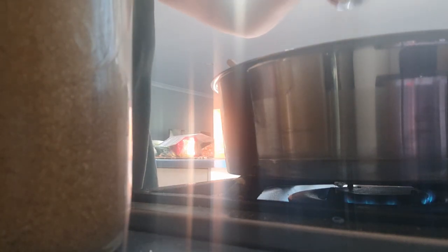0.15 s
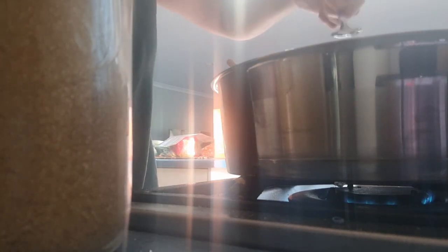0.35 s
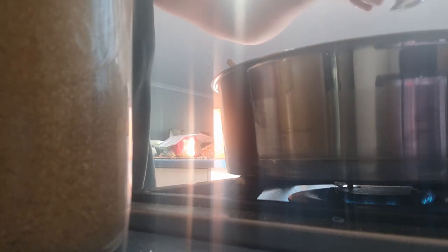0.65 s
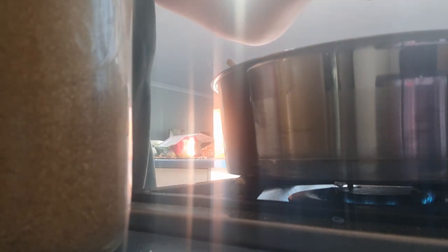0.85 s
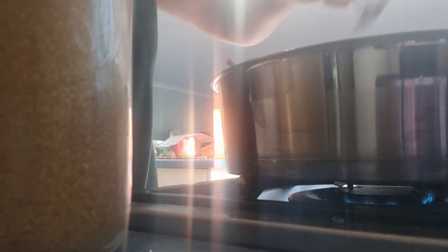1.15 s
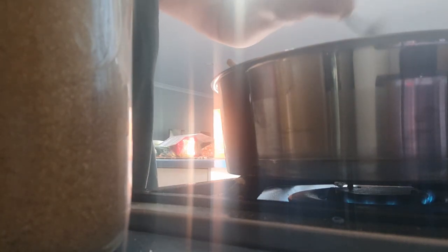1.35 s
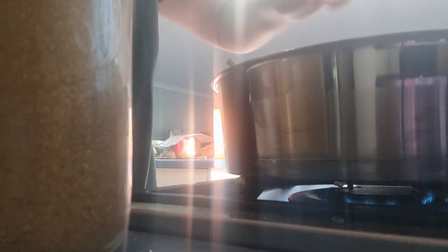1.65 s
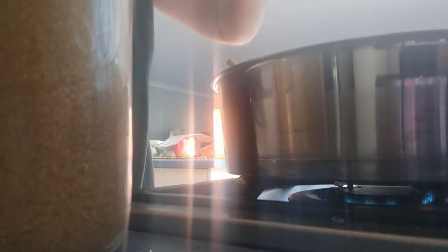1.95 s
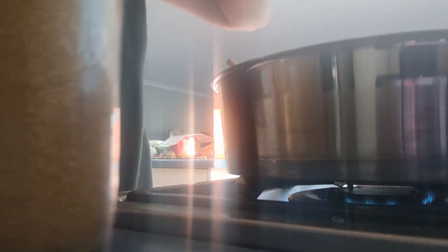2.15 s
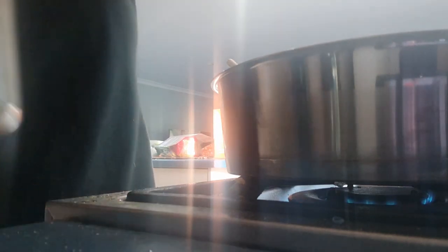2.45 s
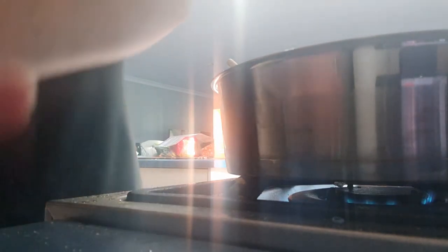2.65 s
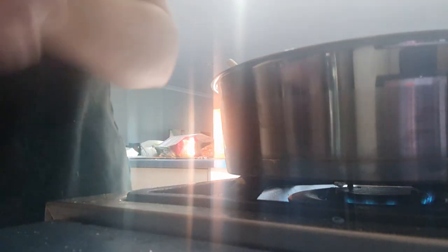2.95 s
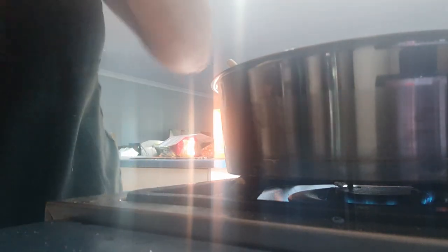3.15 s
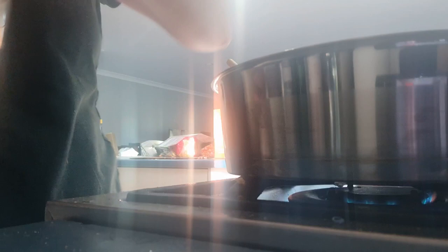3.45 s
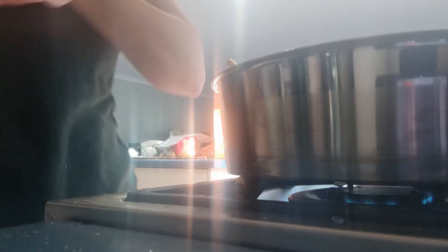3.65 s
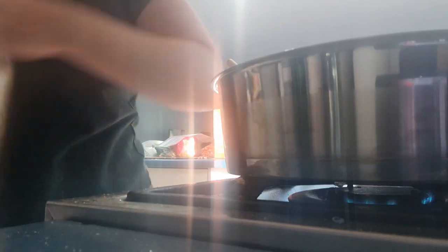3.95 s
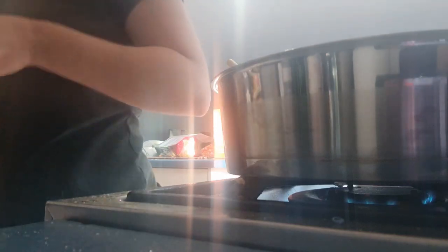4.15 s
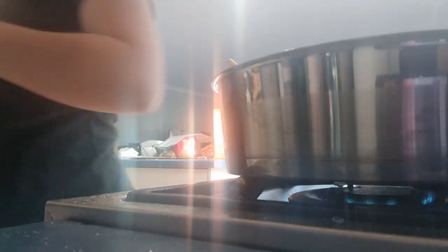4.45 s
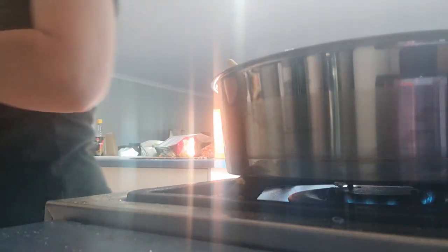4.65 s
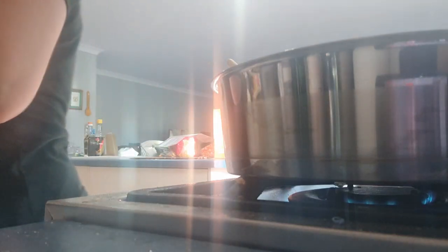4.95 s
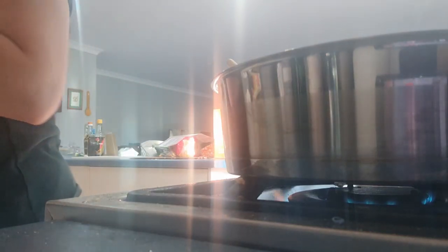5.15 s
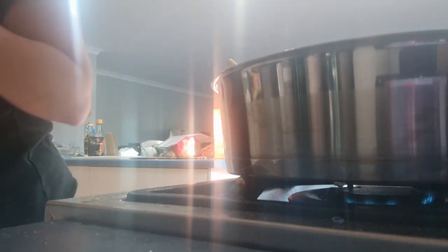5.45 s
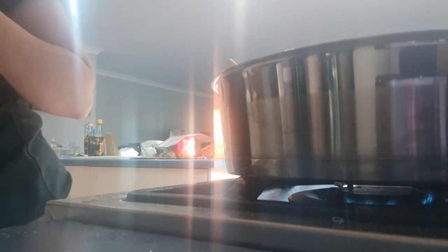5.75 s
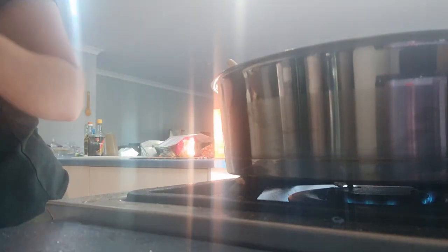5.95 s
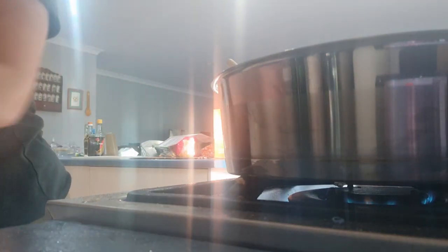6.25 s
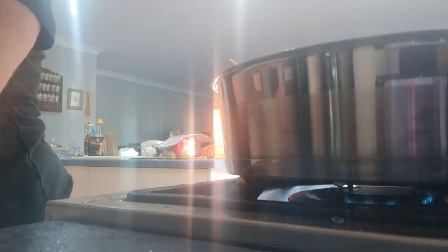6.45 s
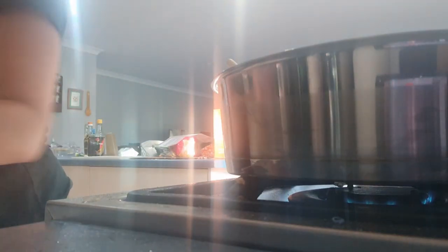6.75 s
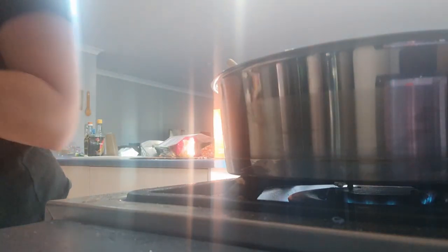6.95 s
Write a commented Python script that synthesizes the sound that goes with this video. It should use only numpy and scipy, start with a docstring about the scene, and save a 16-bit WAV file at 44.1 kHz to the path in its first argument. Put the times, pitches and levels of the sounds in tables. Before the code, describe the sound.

A gas burner hisses and flutters steadily under a steel pot while containers click and knock, then heavy thumps and one bright dish clink.

```python
"""A kitchen worktop, with a stereo microphone standing on it close to a steel pot on a lit gas burner.
Broad noise makes the jet's hiss; resonant noise makes the flame that rumbles and rings the gap under the pot.
A cook handles seasoning containers: noise bursts and damped modes make light clicks, knocks and thumps,
two of them heavy, and shaped noise the scrape of a jar. Near the end come a dish's clatter and bright clink."""
import sys
import numpy as np
from scipy import signal
from scipy.fft import rfft, irfft, next_fast_len
from scipy.io import wavfile
from scipy.ndimage import uniform_filter1d, map_coordinates

SR = 44100
rng = np.random.default_rng(int(sys.argv[2]) if len(sys.argv) > 2 else 0)


def pcm_store(signal):
    """Save signal as 16-bit PCM."""
    levels = np.round(np.clip(np.atleast_2d(signal), -1, 1) * 32767)
    wavfile.write(sys.argv[1], SR, levels.astype(np.int16).T)


N = 313342
TIME = np.arange(N) / SR  # seconds
AGE = np.arange(SR * 3 // 4) / SR  # seconds since a blow
EARS = np.array([[0.5], [-0.5]])  # left and right channel, as halves of a difference


def amp(db):
    """Decibels to gain."""
    return 10 ** (np.asarray(db) / 20)


def unit(x):
    """Scale to rms 1."""
    return x / np.sqrt(np.mean(x ** 2) + 1e-20)


def peaked(x, db):
    """Scale to a peak level in dB."""
    return amp(db) * x / np.abs(x).max()


def along(points, hz):
    """Interpolate (Hz, value) points on a log frequency axis."""
    f, v = np.transpose(points)
    return np.interp(np.log(hz + 1), np.log(f + 1), v)


def wobble(rate):
    """A smooth random curve with rate knots a second."""
    knots = rng.standard_normal(int(N * rate / SR) + 4)
    return map_coordinates(knots, [np.arange(N) * rate / SR])


def held(rows, attack_s, release_s):
    """Gain of (s, hold s, dB) events that rise up to s, hold and die away."""
    gain = np.zeros(N)
    for s, hold_s, db in rows:
        rise = np.minimum(TIME - s, 0) / attack_s
        fall = np.maximum(TIME - s - hold_s, 0) / release_s
        gain += amp(db) * np.exp(rise - fall)
    return gain


def filtered(x, response):
    """Multiply the spectrum of x by a response of frequency."""
    n = x.shape[-1]
    m = next_fast_len(n + 8192)
    return irfft(rfft(x, m) * response(np.fft.rfftfreq(m, 1 / SR)), m)[..., :n]


def humps(peaks, hz):
    """Power response of a set of (Hz, width Hz, dB) resonances."""
    power = 0
    for center, width, db in peaks:
        damping = (hz * width) ** 2
        power = power + amp(db) ** 2 * damping / ((center ** 2 - hz ** 2) ** 2 + damping)
    return power


def noise(gain, size):
    """Coloured stereo noise of rms 1: alike in the bass, unrelated in the treble."""
    # Likeness of the two channels. Each row: frequency in Hz, coherence.
    alike = [(100, .97), (400, 0.96), (750, 0.42), (2000, 0.39), (3300, 0.063), (15000, 0.037)]

    def mid_side(hz):
        turn = np.arccos(np.clip(along(alike, hz), -1, 1)) / 2
        return gain(hz) * np.array([np.cos(turn), np.sin(turn)])

    mid, side = filtered(rng.standard_normal((2, size)), mid_side)
    return unit(np.array([mid + side, mid - side]))


def fade(t60):
    """Exponential decay after a blow, down 60 dB in t60 seconds."""
    return amp(-60 * AGE / max(t60, 1e-3))


def swell(rise):
    """A contact builds up over rise seconds."""
    return 1 - np.exp(-(AGE / rise) ** 2)


def burst(spectrum, t60):
    """Dying noise: a crowd of modes too dense to tell apart."""
    return noise(lambda hz: amp(along(spectrum, hz)), size=len(AGE)) * fade(t60)


def ring(modes, spread):
    """Damped modes, a little different at each blow; spread scales the phase scatter between channels, in radians."""
    total = np.zeros((2, len(AGE)))
    for hz, db, t60 in modes:
        size_db, skew = rng.standard_normal(2)
        swing = np.sin(2 * np.pi * hz * AGE + spread * skew * EARS)
        total += amp(db + size_db) * fade(t60) * swing
    return total


def softened(x, cut_hz):
    """A soft contact lasts longer and so excites less treble."""
    lowpass = signal.butter(2, min(cut_hz, SR * 0.45), fs=SR, output="sos")
    return signal.sosfilt(lowpass, x)


def placed(x, lead_ms, pan_db):
    """Off-centre source: the left channel leads by lead_ms and is louder than the right by pan_db."""
    shifted = filtered(x, lambda hz: np.exp(2j * np.pi * hz * EARS * lead_ms / 1000))
    return amp(pan_db * EARS) * shifted


def in_kitchen(x, wet_db):
    """A blow plus its own diffuse answer from walls and cupboards, whose treble dies first."""
    # Reverberation of the kitchen. Each row: frequency in Hz, t60 in seconds.
    kitchen = [(100, 0.43), (400, 0.38), (2000, 0.21), (6000, 0.11), (15000, 0.058)]
    hz, t, z = signal.stft(noise(np.ones_like, size=len(AGE)), SR, nperseg=256)
    decay = amp(-60 * t / along(kitchen, hz)[:, None])
    tail = signal.istft(z * decay, SR, nperseg=256)[1][:, :len(AGE)]
    tail = tail * (1 - fade(0.02))  # the answer gathers after the direct sound
    answer = signal.fftconvolve(x, tail / np.linalg.norm(tail[0]), axes=1)[:, :len(AGE)]
    return x + amp(wet_db) * answer


def add(track, s, x):
    """Mix x into the track at s seconds."""
    start = round(s * SR)
    track[:, start:start + x.shape[1]] += x[:, :N - start]


def bounces(s, flight_s, loss_db, count=3):
    """(s, gain) of each contact of a thing that lands and bounces ever faster and more softly."""
    shrink = 0.65  # each flight over the one before
    contacts = []
    for k in range(count):
        flown_s = flight_s * sum(shrink ** j for j in range(k))
        contacts.append((s + flown_s, amp(-loss_db * k)))
    return contacts


def patchy(x, depth_db):
    """Turbulence: each region of the spectrum swells and sinks on its own."""
    z = signal.stft(x, nperseg=1024)[2]
    field = rng.standard_normal(z.shape[1:])
    field = uniform_filter1d(field, size=4, axis=0)  # over frequency
    field = uniform_filter1d(field, size=9, axis=1)  # over time
    return unit(signal.istft(z * amp(depth_db * unit(field)), nperseg=1024)[1][:, :N])


def sputter():
    """The flame's quick swings in dB: puffs that jump and die away, over a constant flutter."""
    # Short puffs of the flame. Each row: start in seconds, jump in dB.
    puffs = [(.177, 5), (.413, 9.5), (0.442, 10.5), (.495, 5.5), (.537, 13), (0.561, 4), (.6, 6),
             (0.747, 8.5), (1.14, 4.5), (4.726, 10), (4.876, 6)]
    puff_s = 0.015  # decay time of a puff
    small_per_s, small_db = 5.4, 3  # smaller puffs, up to this size, come at random
    chance = rng.random((round(small_per_s * N / SR), 2))
    small = [(when * N / SR, small_db * size) for when, size in chance]
    swings_db = 1.4 * wobble(40)
    for s, db in [*puffs, *small]:
        swings_db += db * (TIME > s) * np.exp(-np.abs(TIME - s) / puff_s)
    return swings_db


def burner():
    """Gas hisses through the mixing tube; the sputtering flame rumbles and rings the gap under the pot."""
    # Resonances of the gap between hob and pot. Each row: frequency in Hz, width in Hz, relative level in dB.
    gap = [(524, 108, -3.5), (572, 29, 0.5), (733, 26, -4.5), (897, 46, 2.5), (984, 19, -3),
           (1223, 65, -2.5), (1401, 60, 0.5), (1490, 23, 1), (1840, 55, -16), (1880, 47, -8.5),
           (2278, 70, -1.5), (2524, 95, -4.5), (3093, 97, -4.5), (3430, 110, -4.5)]
    # Resonances of the burner's mixing tube. Each row: frequency in Hz, width in Hz, relative level in dB.
    tube = [(2740, 110, -6.5), (3090, 42, -1), (3210, 81, -9), (3240, 48, -9.5), (3717, 20, 3.5),
            (4182, 113, 0), (4372, 29, 3), (4680, 39, 2), (4953, 64, 3.5), (5300, 42, 0), (5810, 61, -1),
            (6040, 65, -2), (6420, 120, -8.5), (6780, 98, -4.5), (7230, 94, -6.5), (7970, 200, -12.5)]
    # Spectrum of the gas jet. Each row: frequency in Hz, relative level in dB per Hz.
    jet_spectrum = [(250, -46), (600, -46), (1500, -8), (3000, -16.5), (5200, -5.5), (6500, -11.5),
                    (8200, -14), (9300, -22), (10500, -16), (13000, -15.5), (16000, -16)]
    # Spectrum of the flame's rumble. Each row: frequency in Hz, relative level in dB per Hz.
    rumble_spectrum = [(20, -22), (45, 6.5), (62, -6.5), (95, 6.5), (130, -6), (165, 1.5), (205, -10),
                       (255, 3), (330, -12), (430, -7.5), (700, -50), (2000, -60)]
    # Strength of the flame. Each row: time in seconds, strength in dB.
    flame_strength = [(0.0, -47), (0.28, -48), (0.69, -44), (0.95, -43), (1.07, -45), (3.07, -51),
                      (3.38, -45.5), (3.9, -48.5), (4.1, -45.5), (4.53, -48), (5.14, -44), (5.88, -49.5),
                      (6.05, -50), (6.13, -51.5), (6.69, -52), (7.11, -46.5)]
    # The pot wall sings out for a while. Each row: time of full level in seconds, hold in seconds, level in dB.
    swells = [(3.7, 0.11, -60), (4.1, 0.34, -53.5), (4.64, 0.11, -47), (5.0, 0.57, -48), (5.7, 0.24, -52),
              (6.8, 0.1, -57)]
    usual_db = -47.5  # the flame at its usual strength
    flame_db, jet_db, singing_db, rumble_db = -44.5, -43.5, -55.5, -56.5  # the layers at that strength
    jet_follows, singing_follows = 0.34, 0.93  # dB per dB of flame

    def jet_gain(hz):
        return np.sqrt(amp(along(jet_spectrum, hz)) ** 2 + humps(tube, hz))

    def flame_gain(hz):
        treble_loss = 1 + (hz / 3800) ** 6
        bass_loss = 1 + (430 / (hz + 1)) ** 6
        return np.sqrt(humps(gap, hz) / treble_loss / bass_loss)

    strength_db = np.interp(TIME, *np.transpose(flame_strength)) - usual_db
    jet = patchy(noise(jet_gain, size=N), depth_db=2.44)
    flame = noise(flame_gain, size=N)
    singing = noise(lambda hz: humps([(2172, 63, 0)], hz), size=N)
    rumble = noise(lambda hz: amp(along(rumble_spectrum, hz)), size=N)
    flutter_db = sputter()  # the flame follows it fully, jet and rumble only in part

    jet_gains = amp(jet_db + jet_follows * strength_db + 0.15 * flutter_db)
    flame_gains = amp(flame_db + strength_db + flutter_db)
    song = amp(singing_db + singing_follows * strength_db) + held(swells, attack_s=0.017, release_s=0.031)
    song_gains = song * amp(2 * wobble(14))  # the singing wavers
    rumble_gains = amp(rumble_db + 0.5 * flutter_db + wobble(5.72))
    return jet_gains * jet + flame_gains * flame + song_gains * singing + rumble_gains * rumble


def lids():
    """Small hard parts of lids, shakers and utensils snap: a dry click with one short ping."""
    # Clicks, before panning and room. Each row: start in seconds, snap peak in dB, ping level in dB, ping in Hz.
    clicks = [(1.146, -27, -32, 5840), (1.908, -23, -31, 4160), (2.936, -36.5, -29, 2250),
              (3.018, -56, -31, 2200), (3.172, -17.5, -39, 5250), (3.1843, -8.5, -22, 5760),
              (3.186, -19.5, -13.5, 3480), (3.305, -24, -23.5, 6170), (3.584, -20, -30, 2040),
              (3.6856, -23, -26.5, 8100), (4.176, -14.5, -21.5, 2360), (4.258, -24, -25, 5250),
              (4.298, -30.5, -31, 2220), (4.45, -22, -17, 5290), (4.727, -26, -33, 2120),
              (6.345, -16.5, -36, 4080)]
    # Spectrum of a snap. Each row: frequency in Hz, relative level in dB per Hz.
    click_spectrum = [(200, -21), (600, 4), (1700, -19), (2400, -5), (3500, -6), (5500, -2), (7000, -7.5),
                      (9300, -14.5), (12000, -9), (16000, -4)]
    reach = 2.3  # the snap reaches this multiple of the ping: smaller parts click brighter
    track = np.zeros((2, N))
    for s, snap_db, ping_db, ping_hz in clicks:
        snap = burst(click_spectrum, t60=0.038) * swell(0.00034)
        snap = peaked(softened(snap, reach * ping_hz), snap_db)
        ping = amp(ping_db) * ring([(ping_hz, 0, 0.03)], spread=0.36) * swell(0.00083)
        click = placed(snap + ping, lead_ms=0.34, pan_db=3)
        add(track, s, in_kitchen(click, wet_db=-9.5))
    return track


def worktop():
    """Things are set down and bounce: the board booms and whatever stands on it rattles."""
    # Blows on the worktop, before panning and room. Each row: start in seconds, boom peak in dB,
    # rattle peak in dB, contact cut-off of the boom in Hz, first bounce in seconds, loss per bounce in dB.
    thumps = [(1.814, -22.5, -28.5, 250, .028, 17), (2.248, -30, -56, 180, 0.016, 20),
              (2.798, -35.5, -30, 397, 0.019, 21), (3.228, -37, -56, 150, 0.0216, 16),
              (3.312, -35, -50, 200, 0.0217, 9), (5.857, -3.5, -6.5, 910, 0.048, 11),
              (6.059, -6, -5, 1390, .022, 17), (6.124, -11.5, -14, 1380, .046, 13),
              (6.366, -16.5, -24, 504, 0.035, 6.5), (6.549, -33.5, -36.5, 393, .02, 33)]
    # Modes of worktop and hob. Each row: frequency in Hz, relative level in dB, t60 in seconds.
    board_modes = [(85, -10, 0.11), (98, -8.5, 0.23), (110.4, -24, 0.37), (163.7, -6, 0.16),
                   (188.5, 6, 0.055), (205.5, -13, 0.074), (249.6, -9, 0.21), (417, -22.5, 0.49),
                   (453, -2, 0.058), (519, 5, 0.047), (575, -23.5, 0.14), (843, -18, 0.13),
                   (930, -0.5, 0.04), (1180, -9, 0.059), (1500, -1.5, 0.045), (2030, -15, 0.044),
                   (2375, -17, 0.065)]
    # Rattle of all that stands on the worktop. Each row: frequency in Hz, relative level in dB per Hz.
    rattle_spectrum = [(50, -43), (100, -30), (220, -30), (330, -7), (480, 12), (700, 0), (950, -6),
                       (1250, -5.5), (1700, -8.5), (2700, -18), (4500, -22.5), (9000, -38), (16000, -50)]
    track = np.zeros((2, N))
    for start, boom_db, rattle_db, cut_hz, flight_s, loss_db in thumps:
        for s, gain in bounces(start, flight_s, loss_db):
            boom = softened(ring(board_modes, spread=0.43) * swell(0.0035), cut_hz)
            rattle = burst(rattle_spectrum, t60=0.097) + 0.22 * burst(rattle_spectrum, t60=0.11)
            rattle = rattle * swell(0.002)
            blow = peaked(boom, boom_db) + peaked(rattle, rattle_db)
            blow = placed(blow, lead_ms=0.27, pan_db=-1.0)
            add(track, s, gain * in_kitchen(blow, wet_db=-14))
    return track


def jar():
    """The base of a jar judders over the worktop as it is dragged off: noise under a fast wavering gain."""
    # Two tugs, before the judder. Each row: time of full level in seconds, hold in seconds, level in dB.
    tugs = [(2.135, 0.047, -34.5), (2.22, 0.02, -34.5)]
    # Spectrum of the scrape. Each row: frequency in Hz, relative level in dB per Hz.
    scrape_spectrum = [(60, -18), (150, -1), (250, 4.5), (340, -1), (440, -0.5), (600, -19), (1200, -44)]
    scrape = noise(lambda hz: amp(along(scrape_spectrum, hz)), size=N)
    judder = amp(2.3 * wobble(70))
    return held(tugs, attack_s=0.0096, release_s=0.014) * judder * scrape


def containers():
    """Hollow containers knock dully, bounce and fill the kitchen for a moment."""
    # Bumps, before panning and room. Each row: start in seconds, peak in dB, pitch in Hz,
    # first bounce in seconds, loss per bounce in dB.
    knocks = [(3.184, -13, 588, 0.036, 16.5), (3.303, -27.5, 447, 0.026, 16), (3.581, -33, 568, 0.02, 2),
              (3.662, -37, 463, .059, 15), (3.94, -23.5, 540, 0.015, 6), (4.176, -20, 474, 0.02, 7),
              (4.297, -32, 535, .02, 14)]
    # Modes of a container. Each row: multiple of its pitch, relative level in dB, t60 in seconds.
    hollow = [(1, 2, 0.047), (1.17, -27, 0.039), (.82, -19, 0.26), (.5, -13.5, 0.079), (.23, -20, 0.13)]
    track = np.zeros((2, N))
    for start, db, pitch_hz, flight_s, loss_db in knocks:
        modes = [(pitch_hz * ratio, level, t60) for ratio, level, t60 in hollow]
        for s, gain in bounces(start, flight_s, loss_db):
            knock = peaked(ring(modes, spread=0.87) * swell(0.0018), db)
            knock = placed(knock, lead_ms=0.27, pan_db=0.5)
            add(track, s, gain * in_kitchen(knock, wet_db=-13.5))
    return track


def dish():
    """Quick repeated contacts each clatter and pump more swing into the same modes: one bright clink."""
    # A utensil chatters against a dish. Each row: start in seconds, drive of the ring in dB,
    # drive of the clatter in dB, contact cut-off in Hz.
    clinks = [(6.347, -16.5, -29, 1580), (6.355, -45, -17, 4460), (6.3613, -21, -6, 16000),
              (6.372, -17, -17.5, 12000)]
    # Modes of the dish. Each row: frequency in Hz, relative level in dB, t60 in seconds.
    dish_modes = [(1483, -6, 0.31), (2310, -11.5, 0.12), (2690, -13, 0.089), (3530, -16.5, 0.31),
                  (3800, -18, 0.15), (3930, -1.5, 0.11), (3950, -9.5, 0.28), (3990, -12, 0.17),
                  (4190, -11, 0.2), (4330, -11, 0.23), (4500, -18, .08), (5386, 4.5, 0.15),
                  (5420, -5, 0.15), (5688, -17, .15), (6200, -15, 0.15), (6480, -19, 0.2), (6800, -19, .14),
                  (7700, -13, 0.089), (8260, -3.5, 0.12), (8700, -16, 0.13), (10460, -18, 0.13),
                  (11570, -20, 0.1), (12200, -14, 0.16), (13630, -14, 0.11), (14500, -14, 0.11),
                  (15500, -18, .1)]
    # Clatter of each contact. Each row: frequency in Hz, relative level in dB per Hz.
    clatter_spectrum = [(300, -30), (1800, -9.5), (2400, -3.5), (3200, -14), (3900, 12), (4300, 4),
                        (4900, -12.5), (6200, -7.5), (7300, -24), (8300, -18), (9300, -29), (12500, -14.5),
                        (16000, -23)]
    start = clinks[0][0]
    modes_hz, modes_db, t60 = np.transpose(dish_modes)[:, :, None]
    swing = np.zeros((len(dish_modes), len(AGE)))
    clatter = np.zeros((2, N))
    for s, ring_db, clatter_db, cut_hz in clinks:
        since = np.maximum(AGE - (s - start), 0)
        reach = 1 / np.sqrt(1 + (modes_hz / cut_hz) ** 4)  # a grazing contact stirs only the low modes
        onset = 1 - np.exp(-since / 0.00067)
        swing += amp(ring_db + modes_db - 60 * since / t60) * reach * onset
        hit = softened(burst(clatter_spectrum, t60=0.068) * swell(0.0012), cut_hz)
        add(clatter, s, in_kitchen(amp(clatter_db) * hit, wet_db=-14.0))
    # each mode reaches the two channels at its own phase
    skew = rng.standard_normal((len(dish_modes), 1)) * np.array([[[0.4]], [[-0.4]]])
    clink = (swing * np.sin(2 * np.pi * modes_hz * AGE + skew)).sum(axis=1)
    ringing = np.zeros((2, N))
    add(ringing, start, in_kitchen(clink, wet_db=-18))
    return clatter + placed(ringing, lead_ms=0.04, pan_db=3.5)


def scene():
    """The burner under all the handling."""
    return burner() + lids() + worktop() + jar() + containers() + dish()


def record(dry):
    """The microphone's limits: the bass falls away below 48 Hz and nothing passes from 16050 Hz up."""
    highpass = signal.butter(3, 48, "high", fs=SR, output="sos")
    return filtered(signal.sosfilt(highpass, dry), lambda hz: hz < 16050)


dry = scene()
out = record(dry)
pcm_store(out)
```